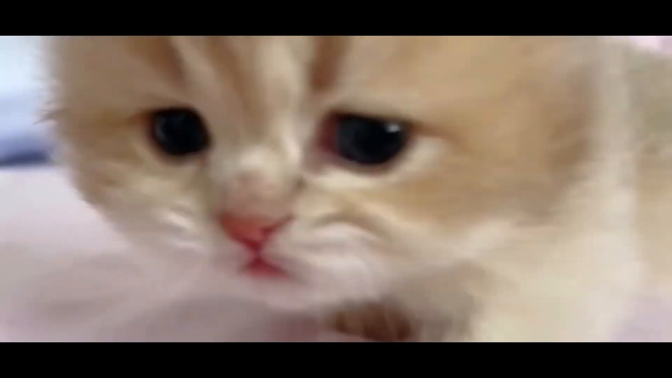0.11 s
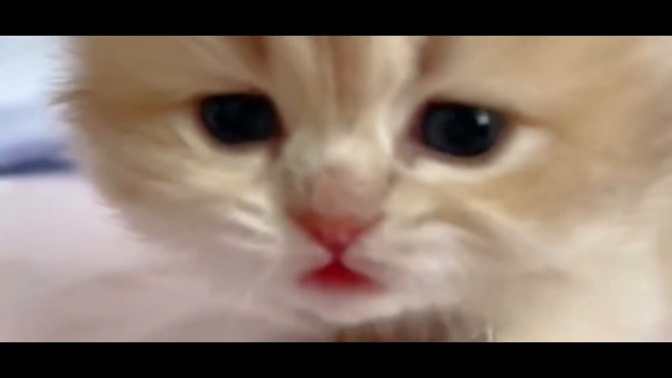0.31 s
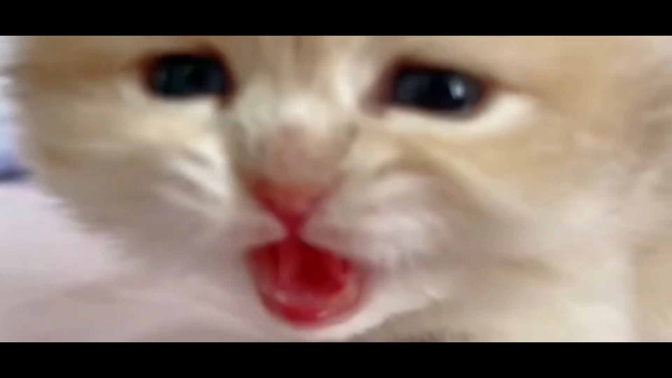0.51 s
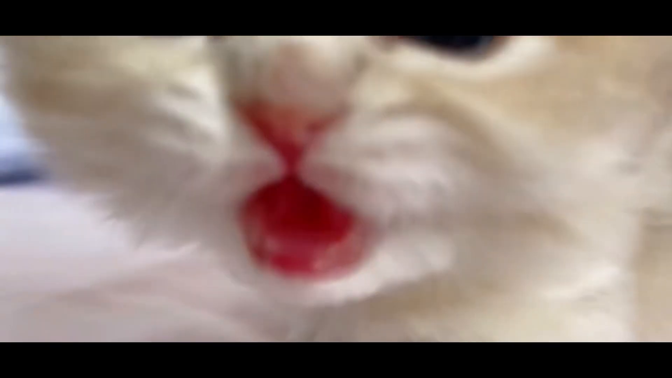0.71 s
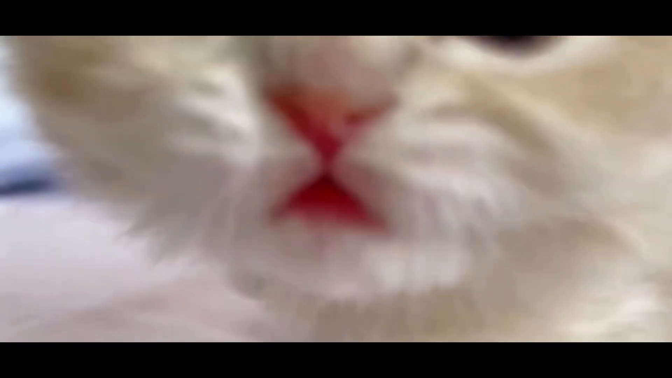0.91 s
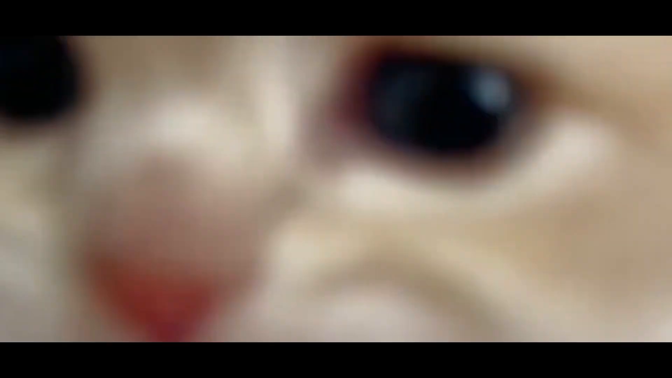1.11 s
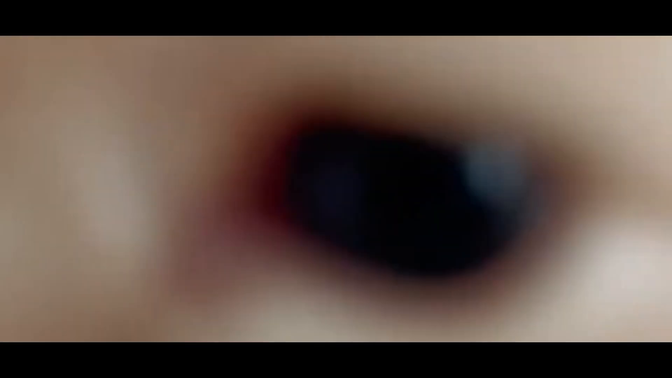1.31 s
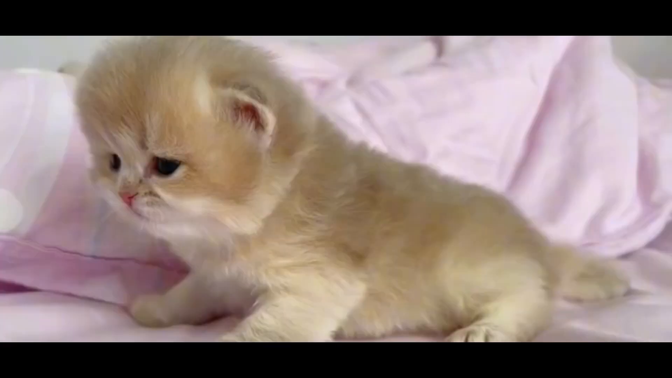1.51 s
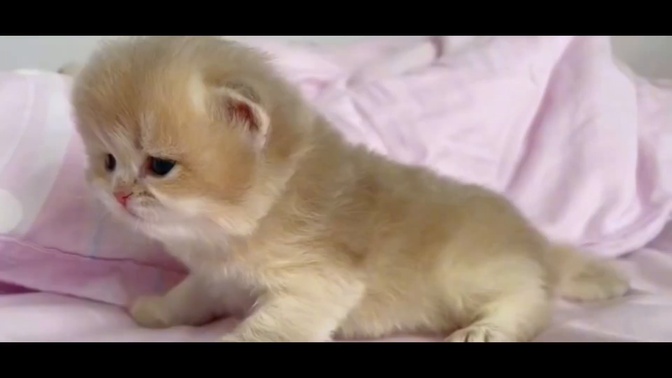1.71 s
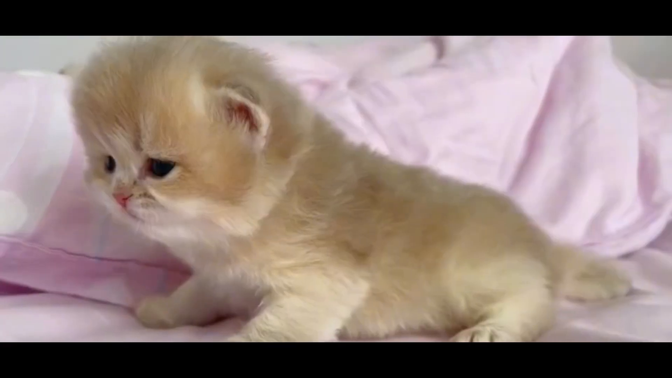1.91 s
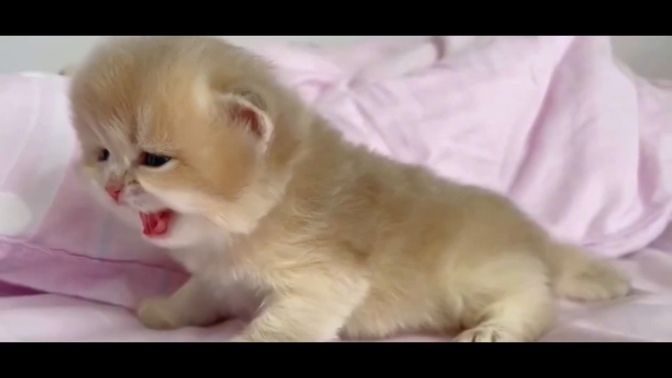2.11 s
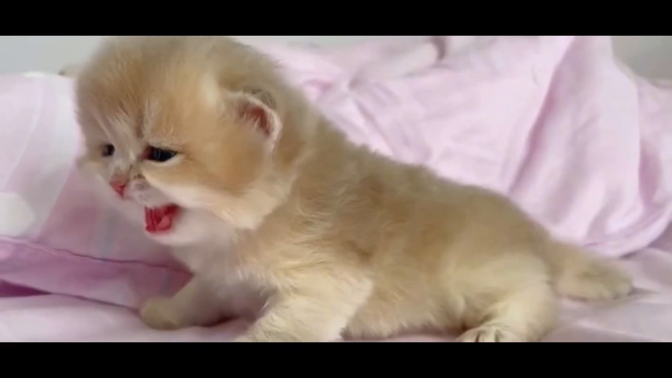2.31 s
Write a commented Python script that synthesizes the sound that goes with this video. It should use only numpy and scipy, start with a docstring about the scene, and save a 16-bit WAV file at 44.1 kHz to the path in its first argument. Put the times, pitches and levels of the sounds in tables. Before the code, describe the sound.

A very young kitten close to the microphone gives a sharp, high mew that glides up and fades, then after a brief silence a second, softer one; faint bedding thumps and a distant cat call in a quiet room.

```python
"""A faint cat calls far off while bedding thumps and rustles; close by, a young kitten mews twice.
Each mew is a stack of harmonics on a moving pitch, with breath, a whistle-like or raspy treble and short cracks.
The far cat is three harmonics with a waver, each thump a short ringing tone, and the rustle shaped noise.
The kitten gets a short room tail. The sound drops out briefly before the second mew, and the
background changes colour during the longest dropout."""
import sys
import numpy as np
from scipy import signal
from scipy.fft import rfft, irfft
from scipy.io import wavfile
from scipy.ndimage import uniform_filter1d

SR = 44100
rng = np.random.default_rng(int(sys.argv[2]) if len(sys.argv) > 2 else 0)


def put_to_file(sound):
    """Save the sound as 16-bit audio at rate SR, in the file named by the first command-line argument."""
    columns = np.atleast_2d(sound).T  # one column per channel
    safe = np.clip(columns, -1, 1)
    whole_steps = np.round(safe * 32767)
    wavfile.write(sys.argv[1], SR, whole_steps.astype(np.int16))


N = 105840  # samples, 2.4 seconds

# Background colour early and late. Each row: frequency in Hz, relative level in dB.
EARLY_COLOUR = [(18, -46), (30, -17), (88, 2.5), (444, -10), (520, -13.5), (624, -20), (749, -13),
                (974, -16.5), (1870, -20), (15600, -40)]
LATE_COLOUR = [(18, -41.5), (30, -15), (53, 6.5), (333, -5), (506, -1), (1200, -16), (1560, -19.5),
               (2030, -25.5), (6240, -39.5), (15600, -65)]
# Background loudness over time. Each row: time in seconds, then rumble, rustle and hiss levels in dB.
RUSTLE_LEVELS = [(0, -65.5, -59, -58.5), (.1, -51, -40, -63.5), (.2, -68, -31.5, -46),
                 (.235, -87.5, -41.5, -80), (0.362, -87, -89.5, -87.5), (.42, -72, -78, -78),
                 (0.552, -69.5, -58.5, -74.5), (0.658, -61, -62.5, -55.5), (.7, -66, -53.5, -53),
                 (0.851, -55, -44.5, -54), (.95, -63.5, -56.5, -59), (1.151, -60.5, -58, -63),
                 (1.25, -63, -48.5, -58.5), (1.32, -65, -67, -66.5), (1.399, -65.5, -71.5, -62.5),
                 (1.56, -62.5, -58.5, -62), (1.7, -57, -55.5, -56), (1.75, -63, -55.5, -43.5),
                 (1.899, -60, -64, -61.5), (2.099, -63, -59, -78.5), (2.199, -56, -56, -61.5),
                 (2.27, -63.5, -50.5, -58.5), (2.4, -64.5, -72, -59.5)]
COLOUR_CHANGE_S = 1.48
RUMBLE_TOP_HZ, RUSTLE_TOP_HZ = 450, 1100  # where rumble gives way to rustle, and rustle to hiss
PATCHY_DB, FLICKER_DB, HISS_PATCHY_DB = 2.5, 2, 0.54  # unevenness of the lows (first two) and of the hiss

# The far cat's call. Each row: time in seconds, pitch in Hz, level in dB.
FAR_CALL = [(0, 736.4, -63), (.05, 707, -60), (0.108, 649, -63), (.17, 654.4, -70.5), (.2, 674.4, -48),
            (.3, 660.4, -50), (0.399, 643, -52.5), (.44, 666, -62.5), (.46, 677, -51), (.52, 642, -74.5)]
HELD_NOTE_ROW = 4  # the held note starts at this row
FAR_OVERTONES_DB = {2: -11.5, 3: -23.5}  # harmonic number and level against the fundamental
FAR_ONSET_DB = 17  # extra overtones at the start, gone by the held note
FAR_WAVER = 0.004  # share of the pitch

# Soft thumps in the bedding. Each row: start in seconds, level in dB, pitch in Hz.
THUMP_HITS = [(0.018, -49, 790), (0.049, -48, 563), (0.062, -38, 802), (0.072, -28, 794), (0.109, -49, 700),
              (0.747, -49.5, 780), (0.9, -43.5, 784), (1.038, -52.5, 230), (1.101, -49, 734),
              (1.229, -30, 797), (1.561, -48.5, 537), (1.631, -50, 393), (1.662, -49, 551),
              (1.788, -45, 747), (2.199, -51, 538), (1.2245, -43, 635), (1.243, -48.5, 610)]
# Dull tones shared by every thump. Each row: frequency in Hz, level in dB against the thump's own pitch.
BEDDING_TONES = [(260, -10), (560, -5), (1350, -25.5)]
THUMP_RISE_S, THUMP_T60_S = 0.005, 0.016  # swell time, and time to fall by 60 dB

# Short cracks and grit in the voice. Each row: start in seconds, level in dB, pitch in Hz.
VOICE_CRACKS = [(.199, -11.5, 5340), (0.835, -21, 2990), (.855, -33, 4400), (0.861, -37, 4473),
                (.8635, -22, 4600), (0.87, -22, 4440), (1.242, -48, 3500), (1.852, -21, 5000)]
CRACK_T60_S = 0.0029

# The two mews. Each row: time in seconds, pitch in Hz, then levels in dB of the fundamental,
# the second harmonic, the higher harmonics together and the breath.
FIRST_MEW_CURVES = [(0.178, 793.6, -85.5, -95, -82, -54), (0.188, 968, -34.5, -61, -44, -40),
                    (0.197, 1079, -28, -35.5, -32, -37.5), (0.21, 1234, -24.5, -31.5, -33, -29),
                    (0.225, 1516, -26, -34.5, -26, -43.5), (0.255, 1740, -39, -36, -22, -30.5),
                    (0.27, 1857, -31.5, -37, -23.5, -45), (0.285, 1999, -25, -24.5, -23, -36),
                    (0.31, 2142, -26, -33, -26.5, -45), (0.335, 2309, -17.5, -34, -32.5, -48),
                    (0.365, 2327, -11, -33, -27, -71), (0.39, 2423, -5.5, -28, -36.5, -77),
                    (0.41, 2269, -8, -37, -30, -68.5), (0.43, 2218, -7, -37.5, -51, -68),
                    (0.445, 2143, -10, -33.5, -31.5, -51.5), (0.46, 2335, -19, -37, -64, -57.5),
                    (0.475, 2270, -22.5, -36, -47, -70), (0.5, 2234, -26.5, -41.5, -76, -88),
                    (0.525, 2290, -27.5, -48, -53, -82.5), (0.57, 2221, -28, -50, -74, -102),
                    (0.62, 2140, -32.5, -57.5, -55, -89.5), (0.67, 1923, -37.5, -71.5, -74, -66),
                    (0.72, 1733, -43, -64, -70.5, -79), (0.76, 1663, -42.5, -60, -79, -58.5),
                    (0.78, 1563, -31, -48, -64, -51), (0.797, 1437, -27, -50.5, -51, -46),
                    (0.811, 1310, -26, -36.5, -47.5, -47), (0.814, 831, -36.5, -34, -34.5, -36),
                    (0.833, 861, -32, -50, -38.5, -53), (0.84, 849.6, -95.5, -95, -105.5, -41),
                    (0.872, 837.4, -87.5, -93.5, -97, -46), (0.876, 830, -90, -95, -95, -55),
                    (0.895, 829, -90, -95, -93, -78)]
SECOND_MEW_CURVES = [(1.823, 850, -94, -97, -106.5, -97), (1.83, 928, -40, -52, -50, -58.5),
                     (1.84, 1106, -42, -58.5, -50.5, -68), (1.862, 1441, -34, -50, -51, -46.5),
                     (1.89, 1727, -39, -42, -42, -66), (1.91, 1859, -38.5, -38.5, -43.5, -49),
                     (1.925, 1876, -35.5, -28, -38, -56.5), (1.945, 2081, -31, -40.5, -37.5, -63),
                     (1.97, 2151, -27.5, -40.5, -39.5, -60), (2.0, 2245, -25.5, -42, -67.5, -74.5),
                     (2.015, 2255, -22.5, -39.5, -71.5, -75.5), (2.032, 2240, -21.5, -40, -74.5, -78),
                     (2.045, 2308, -17, -39.5, -88, -78), (2.075, 2281, -16, -36.5, -82.5, -70.5),
                     (2.1025, 2269, -14, -43, -74.5, -76), (2.1035, 2632, -18.5, -44.5, -69, -65.5),
                     (2.135, 2582, -24, -43.5, -73.5, -82.5), (2.17, 2530, -28.5, -45, -77, -88.5),
                     (2.22, 2433, -32, -49.5, -67.5, -93.5), (2.28, 2293, -37.5, -56.5, -93.5, -100),
                     (2.34, 2195, -41, -63.5, -80, -89), (2.4, 2078, -44, -64, -67, -95)]
# Places where the voice starts or breaks. Each row: middle in seconds, spread in seconds,
# pitch wobble as a share.
VOICE_BREAKS = [(.22, .045, .02), (.453, .008, .024), (.817, .004, .09), (1.85, .018, .015),
                (2.103, .012, .012)]
# Colour of the higher harmonics, and of the breath. Each row: frequency in Hz, relative level in dB.
MOUTH_COLOUR = [(2000, -2.5), (3300, 13.5), (5000, -12.5), (6400, -5.5), (7300, -16.5), (7700, -22),
                (8200, -43.5), (8800, -79)]
BREATH_COLOUR = [(200, -71), (600, -34.5), (900, -5), (1500, 1), (2800, 0), (4500, 6.5), (6800, -8),
                 (7800, -22.5), (8600, -48.5)]
# Treble loudness, one list per mew. Each row: time in seconds, level in dB.
TREBLE_LEVELS = [
    [(0.18, -85), (0.188, -59), (0.222, -43), (0.27, -43), (0.374, -66), (0.434, -44), (0.446, -71),
     (0.458, -41), (0.5, -84), (0.578, -65), (0.762, -84.5), (0.844, -54), (0.868, -58), (0.9, -78)],
    [(1.825, -83.5), (1.873, -61), (1.917, -68.5), (1.999, -68.5), (2.081, -81), (2.095, -71.5),
     (2.103, -54), (2.111, -58.5), (2.151, -67.5), (2.177, -81), (2.315, -87.5), (2.323, -79), (2.383, -90),
     (2.4, -81)],
]
# Colour of the raspy treble. Each row: frequency in Hz, relative level in dB.
RASP_COLOUR = [(8300, -41.5), (9200, -10.5), (10200, -1), (12200, -5.5), (14300, -3.5), (15700, -9.5)]
# Narrow whistling treble bands heard with the mew. Each row: middle in Hz, half-width in Hz,
# relative level in dB.
WHISTLE_BANDS = [(7950, 90, -3), (10200, 110, 0), (12200, 150, -5), (14250, 80, -10)]
JITTER, SHIMMER_DB = 0.003, 0.3  # constant wobble of pitch (a share), and of the fundamental's level
HOARSE_DB, GRIT_DB = 2, -0.5  # unevenness of the higher harmonics, and of the breath
PUFF = 0.28  # how strongly each cycle of the voice swells the breath
BANDS_ONLY_DB, RASP_ONLY_DB = -41, -22.5  # breath against the fundamental: only bands, only rasp
BLUR_HZ, VOICED = 170, 0.85  # blur of the treble harmonics, and their part in the rasp
TREBLE_DRIFT_DB = 1.8
KITTEN_LOW_HZ = 650  # lows below this are weakened in the kitten's sound
ROOM_T60_S, ROOM_DB = 0.16, -18.5  # fall time of the room tail, and its level against the kitten

# Moments when the sound drops out. Each row: start in seconds, end in seconds, depth in dB.
QUIET_GAPS = [(1.373, 1.381, -21), (1.411, 1.551, -60), (1.742, 1.746, -17)]
MIC_LOW_HZ, EDGE_HZ = 52, 15741  # lowest and highest frequency kept


def amp(db):
    """Turn decibels into a plain multiplier."""
    return 10 ** (np.asarray(db) / 20)


def evened(x):
    """Scale to an rms of 1."""
    return x / np.sqrt(np.mean(x ** 2) + 1e-20)


def read(points, hz):
    """Look up a colour table, moving evenly in log frequency between its rows."""
    f, value = np.transpose(points)
    return np.interp(np.log(hz + 1), np.log(f + 1), value)


def drift(size):
    """Smooth chance of rms 1; a larger size (in samples) drifts more slowly."""
    return evened(uniform_filter1d(uniform_filter1d(rng.standard_normal(N), size), size))


def hiss(gain):
    """Noise of rms 1 with the given gain per frequency."""
    return evened(irfft(rfft(rng.standard_normal(N)) * gain, N))


def high_pass(x, order, hz):
    """Weaken everything below a frequency."""
    return signal.sosfilt(signal.butter(order, hz, "high", fs=SR, output="sos"), x)


def rustle():
    """Random short-time spectra, patchy and flickering in the lows, smoother in the hiss."""
    frames = N // 128 + 5
    hz = np.fft.rfftfreq(512, 1 / SR)[:, None]
    real, imaginary, patches = rng.standard_normal((frames, 257, 3)).T
    noise = real + 1j * imaginary
    patches = evened(uniform_filter1d(uniform_filter1d(patches, 3, 0), 8, 1))
    flicker = evened(uniform_filter1d(rng.standard_normal(frames), 4))
    t = np.arange(frames) * 128 / SR
    s, *levels = np.transpose(RUSTLE_LEVELS)
    rumble_db, rustle_db, hiss_db = (np.interp(t, s, c) for c in levels)
    # Soft shares: near 1 below each frequency, near 0 above
    below_rumble_top, below_rustle_top = (1 / (1 + (hz / f) ** 6) for f in (RUMBLE_TOP_HZ, RUSTLE_TOP_HZ))
    level = below_rumble_top * rumble_db + (below_rustle_top - below_rumble_top) * rustle_db
    level = level + below_rustle_top * (PATCHY_DB * patches + FLICKER_DB * flicker)
    level = level + (1 - below_rustle_top) * (hiss_db + HISS_PATCHY_DB * patches)
    colour = amp(np.where(t < COLOUR_CHANGE_S, read(EARLY_COLOUR, hz), read(LATE_COLOUR, hz)))
    colour = colour / np.sqrt((colour ** 2).mean(0))
    white = signal.istft(noise, nperseg=512, noverlap=384)[1].std()
    return signal.istft(noise * colour * amp(level) / white, nperseg=512, noverlap=384)[1][:N]


def far_cat():
    """A dull call: a fundamental that wavers slightly, with overtones that grow hoarser."""
    t = np.arange(N) / SR
    s, hz, db = np.transpose(FAR_CALL)
    held_s = s[HELD_NOTE_ROW]
    pitch = np.interp(t, s, hz) * (1 + FAR_WAVER * drift(size=300))
    turn = 2 * np.pi * np.cumsum(pitch) / SR
    bright = FAR_ONSET_DB * np.clip(1 - t / held_s, 0, 1)
    tone = amp(2.4 * drift(size=260)) * np.cos(turn)
    for k, overtone_db in FAR_OVERTONES_DB.items():
        hoarse = 1 + t / held_s * drift(size=120)
        tone = tone + amp(overtone_db + bright) * hoarse * np.cos(k * turn)
    return np.sqrt(2) * tone * amp(np.interp(t, s, db, right=-200))


def thumps():
    """Each thump swells quickly and rings a few cycles over the dull body of the bedding."""
    out = np.zeros(N + SR)
    t = np.arange(3000) / SR
    shape = (1 - np.exp(-(t / THUMP_RISE_S) ** 2)) * amp(-60 * t / THUMP_T60_S)
    shape = shape / shape.max()
    body = sum(amp(db) * np.sin(2 * np.pi * hz * t) for hz, db in BEDDING_TONES)
    for s, db, hz in THUMP_HITS:
        out[round(s * SR):][:len(t)] += amp(db) * (np.sin(2 * np.pi * hz * t) + body) * shape
    return out[:N]


def room(x):
    """A short soft-furnished tail of sparse echoes that die away."""
    taps = np.zeros(12000)
    at = np.arange(200, 11980, 20)
    sign = rng.choice([-1., 1.], len(at))
    taps[at + rng.integers(0, 20, len(at))] = sign * amp(-60 * at / SR / ROOM_T60_S)
    return signal.fftconvolve(x, taps / np.linalg.norm(taps))[:N]


def cracks():
    """Each crack is a sine that rings a few cycles and dies away fast."""
    out = np.zeros(N)
    t = np.arange(400) / SR
    for s, db, hz in VOICE_CRACKS:
        rise = np.minimum(t * hz / 2, 1)  # over two cycles
        out[round(s * SR):][:len(t)] += amp(db - 60 * t / CRACK_T60_S) * rise * np.sin(2 * np.pi * hz * t)
    return out


def raspy_treble(hz, turn):
    """High harmonics blurred by slow noise, mixed with hiss of the same colour table."""
    k = np.arange(4, 19)[:, None]
    weight = amp(read(RASP_COLOUR, k * hz)) * (k * hz < EDGE_HZ)
    r = np.exp(-np.pi * BLUR_HZ / SR)
    fuzz = evened(signal.lfilter([1], [1, -2 * r, r * r], rng.standard_normal((len(k), N))))
    blurred = (weight * fuzz * np.sqrt(2) * np.cos(k * turn)).sum(0)
    blurred = blurred / np.sqrt((weight ** 2).sum(0) + 1e-12)
    coloured_hiss = hiss(amp(read(RASP_COLOUR, np.fft.rfftfreq(N, 1 / SR))))
    return VOICED * blurred + np.sqrt(1 - VOICED ** 2) * coloured_hiss


def mew(table, treble):
    """Harmonics on the pitch curve, breath puffed once per cycle, and a raspy treble that narrows to bands."""
    t, f = np.arange(N) / SR, np.fft.rfftfreq(N, 1 / SR)
    s, *curves = np.transpose(table)
    hz, first, second, higher, breath = (np.interp(t, s, c) for c in curves)
    wobble = JITTER + sum(w * np.exp(-((t - mid) / d) ** 2) for mid, d, w in VOICE_BREAKS)
    turn = 2 * np.pi * np.cumsum(hz * (1 + wobble * drift(size=40))) / SR

    k = np.arange(3, 10)[:, None]
    weight = amp(read(MOUTH_COLOUR, k * hz))
    weight = weight / np.sqrt((weight ** 2).sum(0) + 1e-12)
    top = amp(higher + HOARSE_DB * drift(size=90)) * (weight * np.cos(k * turn + k * k)).sum(0)
    fundamental = amp(first + SHIMMER_DB * drift(size=150)) * np.cos(turn)
    tone = fundamental + amp(second) * np.sin(2 * turn) + top

    puffs = 1 + PUFF * np.cos(turn)
    air = amp(breath + GRIT_DB * drift(size=40)) * hiss(amp(read(BREATH_COLOUR, f))) * puffs

    # More breath against the fundamental widens the treble from bands to rasp
    wide = np.clip((breath - first - BANDS_ONLY_DB) / (RASP_ONLY_DB - BANDS_ONLY_DB), 0, 1)
    bands = hiss(sum(amp(db) * np.exp(-((f - mid) / width) ** 2) for mid, width, db in WHISTLE_BANDS))
    mixed = wide * raspy_treble(hz, turn) + np.sqrt(1 - wide ** 2) * bands
    shine = amp(np.interp(t, *np.transpose(treble)) + TREBLE_DRIFT_DB * drift(size=300)) * mixed
    sounding = (t >= s[0]) & (t <= s[-1])
    return sounding * (np.sqrt(2) * tone + air + shine)


def scene():
    """Both mews and the cracks lose their lows, then join their room tail and the background."""
    kitten = mew(FIRST_MEW_CURVES, TREBLE_LEVELS[0]) + mew(SECOND_MEW_CURVES, TREBLE_LEVELS[1]) + cracks()
    kitten = high_pass(kitten, 6, KITTEN_LOW_HZ)
    return (kitten + amp(ROOM_DB) * room(kitten) + far_cat() + thumps() + rustle())[None]


def record(dry):
    """The microphone loses the deep bass, the sound drops out briefly, and the highest treble is cut."""
    t = np.arange(N) / SR
    depth = sum(db * ((t > a) & (t < b)) for a, b, db in QUIET_GAPS)
    gate = uniform_filter1d(amp(depth), 90)  # soft edges
    kept = high_pass(dry, 4, MIC_LOW_HZ) * gate
    treble_cut = signal.firwin(511, EDGE_HZ, window=("kaiser", 9), fs=SR)
    return signal.oaconvolve(kept, treble_cut[None], "same")


dry = scene()
out = record(dry)
put_to_file(out)
```